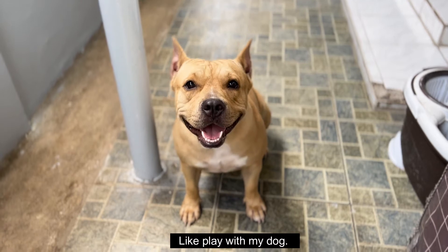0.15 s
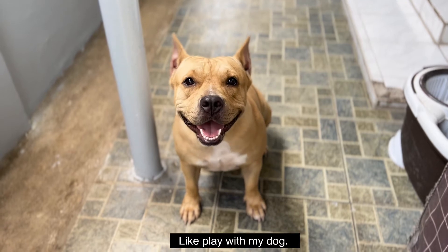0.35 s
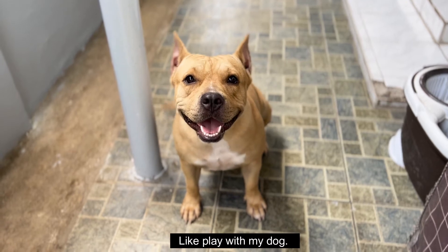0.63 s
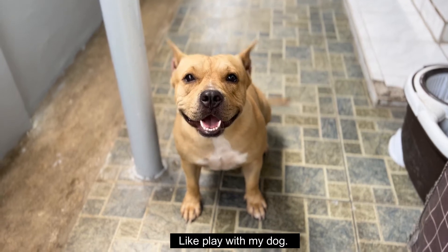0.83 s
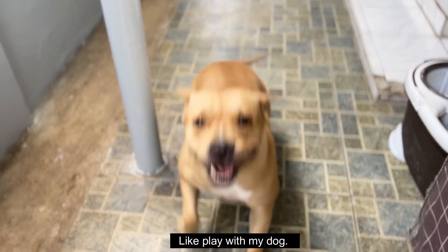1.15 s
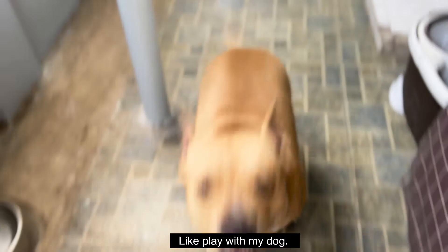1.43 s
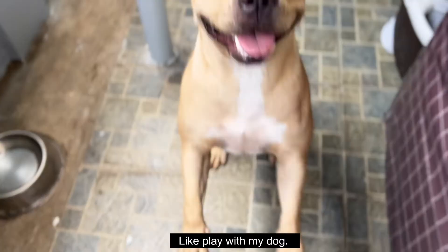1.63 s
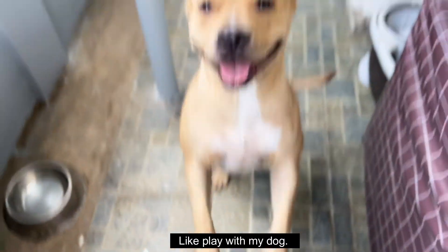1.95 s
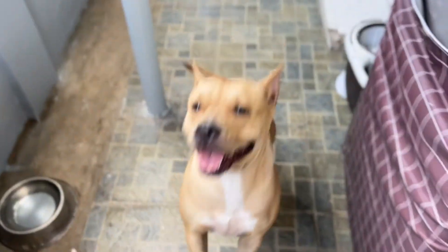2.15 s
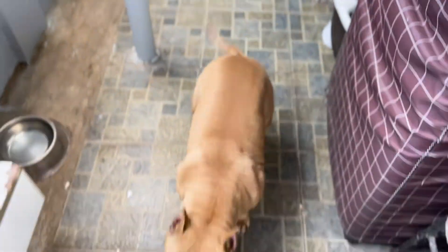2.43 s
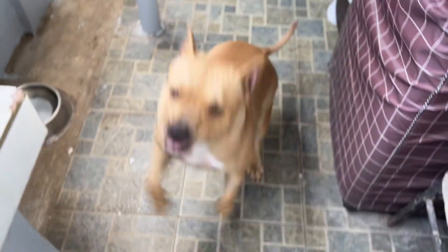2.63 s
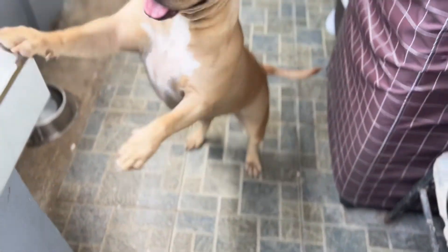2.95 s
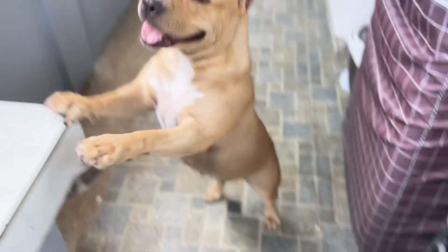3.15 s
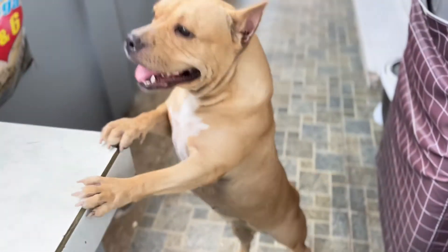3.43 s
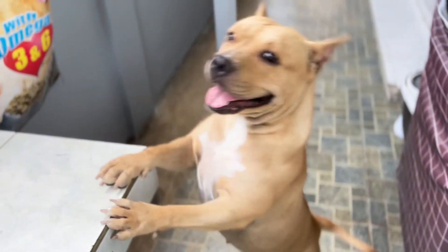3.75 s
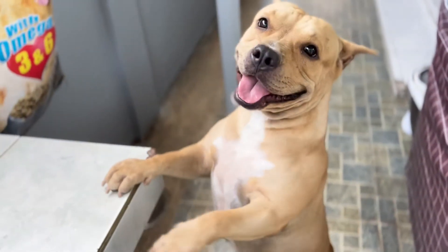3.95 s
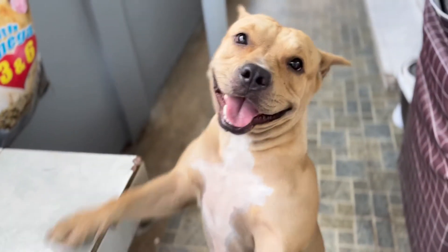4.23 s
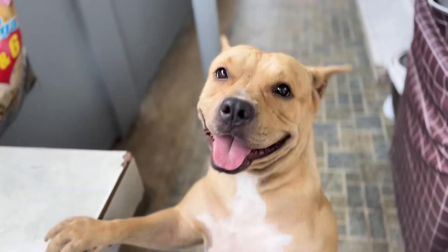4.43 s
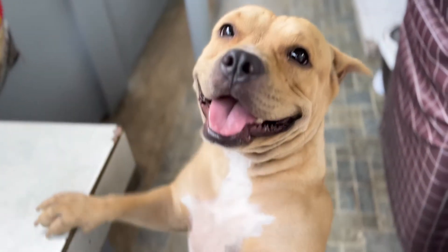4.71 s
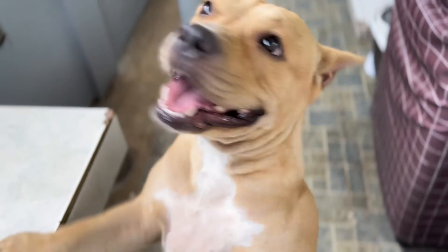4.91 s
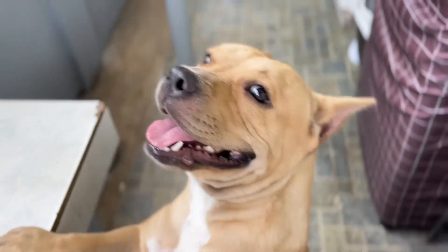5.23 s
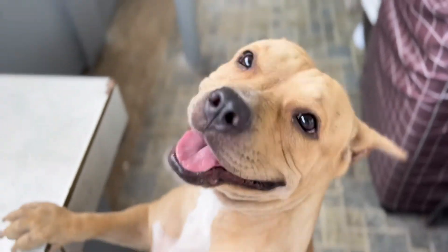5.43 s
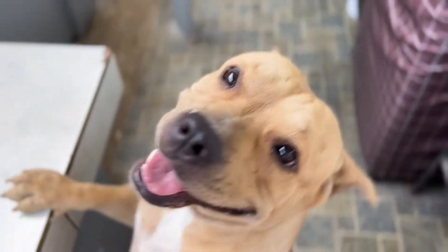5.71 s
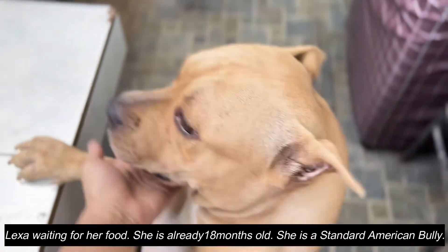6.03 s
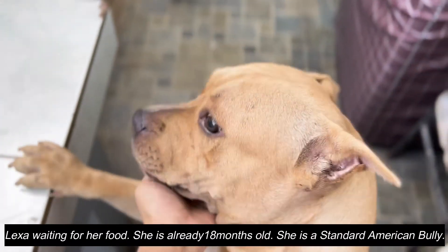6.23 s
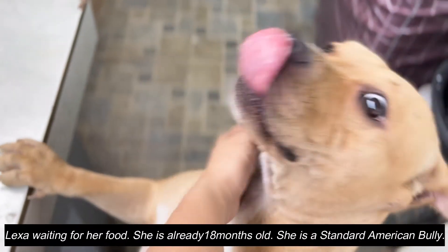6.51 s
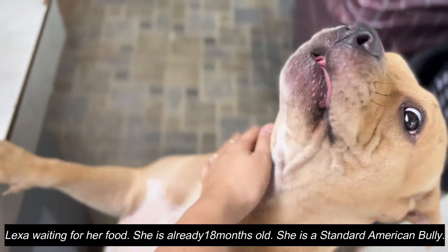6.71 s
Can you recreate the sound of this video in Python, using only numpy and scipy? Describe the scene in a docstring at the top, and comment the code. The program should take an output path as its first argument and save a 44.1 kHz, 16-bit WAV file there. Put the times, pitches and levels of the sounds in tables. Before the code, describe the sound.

Bursts of close, hoarse hen clucks and two shrieks ring around a walled yard, among bird chirps and faint dog panting.

```python
"""A walled, tiled yard. Close by, a hen pushes out hoarse clucks and twice opens her beak into a shriek:
uneven pulses and puffs of air, shaped by her throat. Small birds whistle gliding chirps, and the
falling end of a crow cuts in with a click under the clucks. A dog pants softly, its claws ticking
on the tiles. There are a few dull thuds and a low microphone-handling rumble. The walls slap each
call back over a low murmur and a thin hiss."""
import sys
import numpy as np
from scipy import signal
from scipy.fft import rfft, irfft, next_fast_len
from scipy.io import wavfile

SR = 44100
rng = np.random.default_rng(int(sys.argv[2]) if len(sys.argv) > 2 else 0)


def wav_out(sig):
    """Save sig, one row per channel (or a flat mono array), as 16-bit PCM at SR to the path in sys.argv[1]."""
    wavfile.write(sys.argv[1], SR, np.round(np.clip(np.atleast_2d(sig).T, -1, 1) * 32767).astype(np.int16))


N = 302526


def amp(db):
    """Decibels to gain."""
    return 10 ** (np.asarray(db) / 20)


def unit(x):
    """Scales to rms 1."""
    return x / np.sqrt(np.mean(x ** 2) + 1e-20)


def read(points, hz):
    """Reads a table on a log-frequency axis."""
    f, value = np.transpose(points)
    return np.interp(np.log(hz + 1), np.log(f + 1), value)


def curves(rows):
    """Draws breakpoints out into sample times and one curve per column."""
    s, *columns = np.transpose(rows)
    t = np.arange(s[0], s[-1], 1 / SR)
    return [t] + [np.interp(t, s, c) for c in columns]


def add(mix, s, sound):
    """Mixes a sound in at time s."""
    start = round(s * SR)
    sound = sound[max(-start, 0):]
    part = mix[max(start, 0):][:len(sound)]
    part += sound[:len(part)]


def coloured(x, spectrum, extra_db=lambda hz: 0):
    """EQs by a spectrum and an optional further curve; rms 1."""
    size = next_fast_len(len(x) + 2048)
    hz = np.fft.rfftfreq(size, 1 / SR)
    gain = amp(read(spectrum, hz) + extra_db(hz))
    return unit(irfft(rfft(x, size) * gain, size)[:len(x)])


def wobble(size, rate_hz):
    """Smooth random motion of about unit size."""
    at = np.arange(size) * rate_hz / SR
    knots = np.arange(at[-1] + 2)
    return np.interp(at, knots, rng.standard_normal(len(knots)))


def treble(hz, corner_hz=2400):
    """A shelf that climbs from 0 to 1."""
    return hz ** 4 / (hz ** 4 + corner_hz ** 4)


def resonance(hz, centre_hz, width_hz):
    """A bell of height 1."""
    return 1 / (1 + ((hz - centre_hz) / width_hz) ** 2)


def step(x):
    """A smooth step from 0 to 1 around x = 0."""
    return (1 + np.tanh(x)) / 2


def harmonics(turns, hz, throat_db, flutter_db, count=24):
    """A pulse train built from fluttering harmonics under a throat curve; power 1."""
    k = np.arange(1, count + 1)[:, None]
    flutter = np.array([wobble(len(hz), rate_hz=45) for _ in k]) * np.minimum(k / 5, 1)
    gains = amp(throat_db(k * hz) + flutter_db * flutter) * (k * hz < SR / 2)
    throat_phase = np.pi * k * (k - 1) / 2  # the throat delays each harmonic differently
    waves = np.sin(2 * np.pi * k * turns + throat_phase)
    return (gains * waves).sum(0) / np.sqrt((gains ** 2).sum(0) / 2)


# Air rasping through the hen's throat: freq_hz, gain_db
RASP_EQ = [(100, -42.5), (250, -18.5), (480, -18.5), (720, -14), (950, -3.5), (1400, 1), (1900, -3),
           (2150, -11.5), (2800, -13.5), (3700, -16.5), (4600, -14), (5950, -20.5), (6600, -42),
           (15000, -42.5)]


def syrinx(hz, rough, throat_db, rasp_db):
    """The hen's voice: pulses that grow uneven with roughness, and a puff of air in every cycle."""
    rough = np.clip(rough, 0, 1)
    jitter = .04 * np.sqrt(rough) * wobble(len(hz), rate_hz=300)
    tremor = .005 * wobble(len(hz), rate_hz=90)
    hz = hz * (1 + jitter + tremor)
    turns = np.cumsum(hz) / SR
    puffs = rng.standard_normal(len(hz)) * (1 + .39 * np.cos(2 * np.pi * turns))
    tone = harmonics(turns, hz, throat_db, flutter_db=4.5)
    air_share = .5 * rough
    return np.sqrt(1 - air_share) * tone + np.sqrt(air_share) * coloured(puffs, RASP_EQ, rasp_db)


# The hen's throat, beak nearly shut: freq_hz, gain_db
SHUT_BEAK_EQ = [(250, -39.5), (490, -22.5), (720, -20.5), (1000, -5), (1480, -0.5), (1950, -7), (2150, -26),
                (2480, -11), (3650, -35.5), (4500, -18), (5900, -20), (6600, -52), (9800, -39),
                (15000, -66)]
# Hoarse clucks: peak_s, level_db, pitch_hz, swell_s, fade_s, roughness, treble_db, nasal_db
CLUCKS = [(.003, -9.5, 502.6, 0.017, 0.019, 0.5, -3.5, -3),
          (.208, -7.5, 536.4, 0.027, 0.033, 0.34, -10.5, 10),
          (.418, -7, 522.2, 0.028, 0.034, 0.19, -6.5, 7.5),
          (2.461, -7, 488.8, 0.025, 0.023, 0.62, -5.5, 3.5), (2.704, -7, 476.8, 0.027, 0.016, .4, -3, -7),
          (2.946, -7, 490.3, 0.029, 0.014, 0.37, -3.5, -9), (3.185, -9.5, 479, .024, 0.016, 0.83, -5.5, -5),
          (3.201, -7, 514.2, .011, 0.009, 0.09, -4, -3), (3.541, -8.5, 477.4, .022, .022, 0.7, -7, 6),
          (4.342, -7, 489, 0.023, 0.033, 0.52, -2, 1), (4.548, -10.5, 531, 0.021, 0.055, 0.65, -2, 7),
          (4.58, -8, 519, 0.013, 0.029, .25, 0.5, 6.5)]


def cluck(peak_s, level_db, pitch_hz, swell_s, fade_s, rough, treble_db, nasal_db):
    """A short push of air: pitch and brightness arch with the pressure, and the ends are hoarsest."""
    t = np.arange(-np.sqrt(2) * swell_s, np.sqrt(2) * fade_s, 1 / SR)
    slack = np.where(t < 0, t / swell_s, t / fade_s) ** 2  # 0 at full pressure
    lift = lambda f: treble_db * treble(f) + nasal_db * resonance(f, 3400, width_hz=280)
    throat_scale = 1 + .024 * rng.uniform(-.88, 1)  # the throat is set a little differently each time
    throat = lambda f: read(SHUT_BEAK_EQ, f * throat_scale) + lift(f)
    voice = syrinx(pitch_hz * (1 - .06 * slack), rough + .32 * slack ** 2, throat, lift)
    body = signal.sosfiltfilt(signal.butter(4, 2200, fs=SR, output="sos"), voice)
    top = (voice - body) * amp(-6 * slack)
    envelope = amp(level_db - 17 * slack) * signal.windows.tukey(len(t), .25)
    return peak_s + t[0], (body + top) * envelope


# Colours of the murmur, the hiss and the hum: freq_hz, gain_db
MURMUR_EQ = [(25, 1), (55, -1.5), (110, -12), (180, 2), (240, -7), (550, -9), (1200, -14), (2200, -19),
             (5200, -27), (8400, -51.5), (16000, -61.5)]
HISS_EQ = [(3000, -7.5), (6000, -6), (8400, -20), (10000, -11), (12000, -1), (14500, -5), (16000, -2.5)]
HUM_EQ = [(30, -18), (55, 0), (100, -28), (175, -24), (210, 0.5), (250, -34), (500, -53), (2000, -80)]
# Fader moves on the ambience bed: time_s, murmur_db, hiss_db
BED_LEVELS = [(0, -39, -57), (.9, -51, -65.5), (1.55, -53.5, -66), (1.87, -43.5, -60), (2.05, -48, -64),
              (2.25, -48.5, -61), (2.33, -36.5, -51.5), (2.799, -45, -57), (4.6, -45.5, -54.5),
              (5.199, -59, -61.5), (5.77, -50.5, -62), (5.82, -72.5, -56.5), (6.52, -76.5, -66),
              (6.86, -61.5, -66)]


def ambience(waver_db=3.5, dip_s=1.68, dip_db=-28, hum_start_s=5.44, hum_length_s=.32, hum_db=-44.5):
    """A wavering low murmur and a thin hiss that dip together once; a soft hum swells briefly."""
    s, murmur_db, hiss_db = np.transpose(BED_LEVELS)
    t = np.arange(N) / SR
    murmur = coloured(rng.standard_normal(N), MURMUR_EQ)
    murmur *= amp(np.interp(t, s, murmur_db) + waver_db * wobble(N, rate_hz=25))
    hiss = coloured(rng.standard_normal(N), HISS_EQ) * amp(np.interp(t, s, hiss_db))
    bed = (murmur + hiss) * amp(dip_db * np.exp(-((t - dip_s) / .1) ** 2))
    hum = coloured(rng.standard_normal(int(hum_length_s * SR)), HUM_EQ)
    add(bed, hum_start_s, amp(hum_db) * hum * signal.windows.tukey(len(hum), .4))
    return bed


# The hen's throat, beak wide open: freq_hz, gain_db
OPEN_BEAK_EQ = [(400, -43), (700, -9.5), (1380, -3), (2050, -13), (2700, -18), (3400, -16.5), (4100, -14),
                (4800, -22), (6000, -29.5), (7300, -34), (8200, -45.5), (9500, -36.5), (13000, -46),
                (16000, -47.5)]
# Squawks, with ease, push and break timed from the jump: jump_s, held_hz, rasp_s, rasp_db, shriek_db,
# ease_s, push_s, break_s, swell_db_per_s, whistle_db, strain_ring_db, treble_db
SQUAWKS = [(.52, 667.3, .08, -10.5, -11.5, .064, .188, .2, -75.5, 19, 6, 2.5),
           (4.668, 671.5, .062, -7, -13, .05, .176, .204, 37.5, -11, -2.5, 4)]


def squawk(jump_s, held_hz, rasp_s, rasp_db, shriek_db, ease_s, push_s, break_s,
           swell_db_per_s, whistle_db, strain_ring_db, treble_db):
    """A rasp jumps to a strained shriek as the beak opens; it eases, is pushed again, and collapses."""
    rasp_hz, strain_hz = 502.8, 44.7
    build_db_per_s, collapse_db_per_s, collapse_s, flip_s = 69.5, 184, .055, .002
    t = np.arange(-rasp_s, break_s + collapse_s, 1 / SR)
    jumped, broken = step(t / flip_s), step((t - break_s) / flip_s)
    beak = jumped - broken  # 0 nearly shut, 1 wide open
    strain = step((ease_s - t) / .0092)
    push = np.exp(-((t - push_s) / .013) ** 2)
    hz = (1 - beak) * rasp_hz + beak * (held_hz + strain_hz * (strain + push))
    crack = np.exp(-abs(t) / .0083)  # the shriek starts rough and clears
    rough = (1 - beak) * .87 + beak * (.015 + .07 * strain + .83 * crack + .021 * push)

    held_db = beak * (1 - strain) * (1 - push) * swell_db_per_s * (t - .11)
    db = (1 - jumped) * (rasp_db + build_db_per_s * t)
    db += jumped * (shriek_db + held_db + strain + 4 * push)
    db -= broken * (4 + collapse_db_per_s * (t - break_s))

    # Mid shriek, the fourth harmonic trades level with the throat's main resonance.
    whistle = whistle_db * np.exp(-((t - .108) / .053) ** 4)
    shut = lambda f: read(SHUT_BEAK_EQ, f) + 13 * resonance(f, 950, width_hz=120)
    wide = lambda f: (read(OPEN_BEAK_EQ, f) + treble_db * treble(f)
                      + whistle * resonance(f, 4 * held_hz, width_hz=120)
                      + (3.5 - .37 * whistle) * resonance(f, 1392, width_hz=410)
                      + strain_ring_db * strain * resonance(f, 4300, width_hz=120))
    throat = lambda f: (1 - beak) * shut(f) + beak * wide(f)
    voice = syrinx(hz, rough, throat, lambda f: 5 * resonance(f, 2900, width_hz=900))
    return jump_s - rasp_s, amp(db) * voice * signal.windows.tukey(len(t), .05)


# Distant birds: start_s, length_s, first_hz, last_hz, level_db
FAR_BIRDS = [(0.885, 0.16, 3780, 3563, -46), (3.021, 0.091, 5320, 4200, -38),
             (3.692, .093, 5650, 5090, -48), (5.074, 0.041, 4630, 4640, -34), (5.259, .13, 4960, 4110, -58),
             (6.656, 0.096, 4240, 5380, -58), (6.7, 0.055, 2200, 2026, -62)]


def far_bird(start_s, length_s, first_hz, last_hz, level_db, buzz=.067):
    """A thin slur, made buzzy by a fast shake in pitch."""
    size = int(length_s * SR)
    hz = np.linspace(first_hz, last_hz, size) * (1 + buzz * wobble(size, rate_hz=1500))
    slur = np.sin(2 * np.pi * np.cumsum(hz) / SR) * signal.windows.tukey(size, .6)
    return start_s, amp(level_db) * unit(slur)


# The dull body of a bump: freq_hz, gain_db
BUMP_EQ = [(40, 7), (120, -3), (200, 3), (400, 0), (680, -1.5), (950, -13.5), (1500, -16), (4000, -20.5),
           (9000, -46)]
# Soft thuds, then the handling rumble: start_s, level_db, decay_s, treble_db, bass_db
BUMPS = [(1.039, -28.5, 0.036, -11, -6), (1.091, -39.5, 0.041, -29, 1), (5.506, -37, 0.014, 29, 1),
         (5.533, -26.5, 0.006, 4.5, 3.5), (5.559, -56, 0.17, -14, 36)]


def bumps(attack_s=.0016):
    """Dull thuds and a low microphone-handling rumble that die away."""
    out = np.zeros(N)
    t = np.arange(SR // 4) / SR
    for start_s, level_db, decay_s, treble_db, bass_db in BUMPS:
        shelves = lambda f: treble_db * treble(f, 1900) + bass_db * (1 - treble(f, 170))
        thud = coloured(rng.standard_normal(len(t)), BUMP_EQ, shelves)
        envelope = np.exp(-t / decay_s) * (1 - np.exp(-t / attack_s))
        add(out, start_s, amp(level_db) * thud * envelope)
    return out


def chirp(hz, db, rough, overtone_db, overtone_db_per_octave=-31, flutter_db=7):
    """A gliding whistle with an overtone that fades as it climbs; roughness shakes pitch and level."""
    shaken_hz = hz * (1 + .1 * rough * wobble(len(hz), rate_hz=800))
    phase = 2 * np.pi * np.cumsum(shaken_hz) / SR
    rolloff = (1 - treble(2 * hz, corner_hz=5900) ** 2) ** 2
    overtone = amp(overtone_db + overtone_db_per_octave * np.log2(hz / 2080)) * rolloff
    tone = (np.sin(phase) + overtone * np.sin(2 * phase)) * signal.windows.tukey(len(hz), .14)
    return np.sqrt(2) * tone * amp(db + flutter_db * rough * wobble(len(hz), rate_hz=400))


# The two voices of a rising chirp: time_s, pitch_hz, level_db, roughness
FIRST_VOICE = [(1.936, 1825, -47.5, 0.2), (1.955, 2010, -20, 0.2), (1.972, 2060, -20, 0.14),
               (1.99, 2525, -20, 0.42), (2.006, 2797, -23, 0.71), (2.03, 2980, -13, 0.1),
               (2.052, 3050, -23, 0.4), (2.072, 2570, -34, 0.4)]
SECOND_VOICE = [(1.995, 2970, -41.5, 0.9), (2.015, 3510, -22, 0.8), (2.032, 3810, -19.5, 0.5),
                (2.055, 3496, -24, 0.3), (2.075, 3280, -38.5, .4)]


def rising_chirp():
    """A small bird sweeps upward on one side of its syrinx, and the other side joins in."""
    out = np.zeros(N)
    for voice in (FIRST_VOICE, SECOND_VOICE):
        t, hz, db, rough = curves(voice)
        add(out, t[0], chirp(hz, db, rough, overtone_db=-1.5))
    return out


# The rooster's throat: freq_hz, gain_db
CROW_EQ = [(450, -1.5), (550, -5), (1050, -9), (1600, -20.5), (2100, -13.5), (2450, -19.5), (2720, -12),
           (3250, -22.5), (3800, -36), (6000, -49.5)]
# The falling end of a crow, in two notes: start_s, length_s, first_hz, level_db, attack_s
CROW_NOTES = [(2.294, .372, 547.9, -17, .003), (2.74, .16, 454.3, -36.5, .04)]


def crow(start_s, length_s, first_hz, level_db, attack_s):
    """A clean held note that sinks and fades as the air runs out."""
    sag_hz_per_s, hold_s, fade_db_per_s, release_s = 180, .097, 52.5, .015
    t = np.arange(0, length_s, 1 / SR)
    hz = first_hz - sag_hz_per_s * t
    turns = np.cumsum(hz * (1 + .003 * wobble(len(t), rate_hz=200))) / SR
    tone = harmonics(turns, hz, lambda f: read(CROW_EQ, f), flutter_db=3.5, count=6)
    level = amp(level_db - fade_db_per_s * np.maximum(t - hold_s, 0))
    ends = np.minimum(t / attack_s, 1) * np.minimum((length_s - t) / release_s, 1)
    return start_s, level * ends * tone


# The bright edge of a tick: freq_hz, gain_db
TICK_EQ = [(1000, -31), (3500, -11), (6500, -3), (8200, -12), (9500, -4), (16000, 1.5)]
# A click as the crow cuts in, then the clearest claw ticks and scrapes: start_s, level_db, decay_s
TICKS = [(2.294, -38.5, 0.0024), (2.395, -39, 0.066), (2.543, -32.5, 0.0062), (3.267, -37.5, 0.0074),
         (3.591, -27, .002), (3.92, -43, 0.0056), (3.949, -38, 0.0069), (4.217, -34.5, 0.014),
         (5.798, -32.5, 0.0019), (5.896, -43, .0037), (5.965, -21.5, 0.0068), (6.213, -50, .003),
         (6.3, -45.5, 0.01)]


def ticks(patter_count=9, patter_span_s=(3.2, 5.8), patter_range_db=(-50, -43), patter_decay_s=.006):
    """A sharp click as the crow cuts in; then claws tick and scrape on tile, with a light random patter."""
    out = np.zeros(N)
    t = np.arange(SR // 4) / SR
    patter = [(rng.uniform(*patter_span_s), rng.uniform(*patter_range_db), patter_decay_s)
              for _ in range(patter_count)]
    ring = lambda f: 8.5 * resonance(f, 12600, width_hz=590)
    for start_s, level_db, decay_s in TICKS + patter:
        tick = coloured(rng.standard_normal(len(t)), TICK_EQ, ring)
        add(out, start_s, amp(level_db) * tick * np.exp(-t / decay_s))
    return out


# The dog's throat and muzzle: freq_hz, gain_db
MUZZLE_EQ = [(200, -12.5), (700, -14), (1100, 4.5), (1650, 6), (2050, 2.5), (2450, 5), (3300, 1),
             (4200, -3.5), (6000, -9), (7000, -47), (15000, -34)]
# Soft breaths: start_s, length_s, level_db, treble_db
PANTS = [(3.456, 0.13, -40, 8), (3.754, 0.1, -38.5, 8), (4.026, 0.084, -32.5, -1), (4.455, 0.1, -38.5, -3),
         (5.013, 0.066, -31.5, 13.5), (5.164, 0.078, -33.5, 2), (5.488, 0.053, -40, -33),
         (5.594, 0.12, -42, -9.5), (5.872, .17, -47.5, 3), (6.128, 0.067, -59.5, 13.5),
         (6.659, 0.12, -64.5, 5)]


def pants():
    """Puffs of air swell and fade through the dog's open muzzle."""
    out = np.zeros(N)
    for start_s, length_s, level_db, treble_db in PANTS:
        air = rng.standard_normal(int(length_s * SR))
        breath = coloured(air, MUZZLE_EQ, lambda f: treble_db * treble(f))
        add(out, start_s, amp(level_db) * breath * signal.windows.tukey(len(breath), .8))
    return out


# The shape of a twice-arched chirp: offset_s, pitch_hz, level_db
ARCH_SHAPE = [(0, 2520, -30), (.013, 2760, -29.5), (.028, 4130, -21), (.037, 4390, -22.5),
              (.058, 3533, -11), (.067, 2357, -27.5), (.079, 3350, -17), (.091, 3625, -19.5),
              (.124, 2450, -23), (.132, 2365, -39)]
# Its cues: start_s, gain_db
ARCH_CUES = [(3.999, -2.5), (4.957, -2)]


def arched_chirps():
    """A small bird's whistle arches twice, flaring as it glides through the throat's resonance."""
    out = np.zeros(N)
    _, hz, db = curves(ARCH_SHAPE)
    flare_db = 10 * resonance(hz, 3270, width_hz=130)
    for start_s, gain_db in ARCH_CUES:
        add(out, start_s, chirp(hz, db + flare_db + gain_db, rough=.33, overtone_db=-15))
    return out


# Slaps off the near walls: delay_s, level_db
WALL_SLAPS = [(.0043, -23), (.0117, -27), (0.0199, -12), (0.0304, -13.5), (.044, -18)]
# The yard's reverb time: freq_hz, t60_s
YARD_DECAY = [(250, .5), (700, 0.4), (1400, 0.47), (2500, 0.3), (4600, 0.39), (12000, 0.26)]


def yard(x, walls_db, tail_db, echoes_per_s=3000, predelay_s=.008):
    """The direct sound, slaps off the near walls, and a diffuse tail whose treble dies first."""
    size = SR * 3 // 4
    taps = rng.choice([-1., 1.], size) * (rng.random(size) < echoes_per_s / SR)
    taps *= np.arange(size) > predelay_s * SR
    hz, t, bands = signal.stft(taps, SR, nperseg=256)
    decay = amp(-60 * t / read(YARD_DECAY, hz)[:, None])
    _, tail = signal.istft(bands * decay, SR, nperseg=256)
    response = amp(tail_db) * tail / np.linalg.norm(tail)
    for delay_s, level_db in WALL_SLAPS:
        response[int(delay_s * SR)] += amp(level_db + walls_db)
    return x + signal.fftconvolve(x, response)[:N]


def scene():
    """Each group of sounds with its own sends to the yard, over the ambience bed; mono."""
    hen, rooster, far_birds = np.zeros((3, N))
    for row in CLUCKS:
        add(hen, *cluck(*row))
    for row in SQUAWKS:
        add(hen, *squawk(*row))
    for row in CROW_NOTES:
        add(rooster, *crow(*row))
    for row in FAR_BIRDS:
        add(far_birds, *far_bird(*row))
    mix = yard(hen, walls_db=2, tail_db=-13)
    mix += yard(rooster, walls_db=-19.5, tail_db=-10.5)
    mix += yard(rising_chirp() + arched_chirps(), walls_db=1, tail_db=-13)
    mix += yard(far_birds, walls_db=-2, tail_db=-5)
    mix += yard(pants() + bumps() + ticks(), walls_db=-15.5, tail_db=-8.5)
    return (mix + ambience())[None]


def record(dry, low_cut_hz=125, high_cut_hz=16000):
    """The loudest peaks are rounded off, the microphone thins the bass, and the very top is cut."""
    rounded = dry / (1 + dry ** 10) ** (1 / 10)
    thinned = signal.sosfilt(signal.butter(2, low_cut_hz, "highpass", fs=SR, output="sos"), rounded)
    high_cut = signal.firwin(511, high_cut_hz, window=("kaiser", 9), fs=SR)
    return signal.oaconvolve(thinned, high_cut[None], "same")


dry = scene()
out = record(dry)
wav_out(out)
```